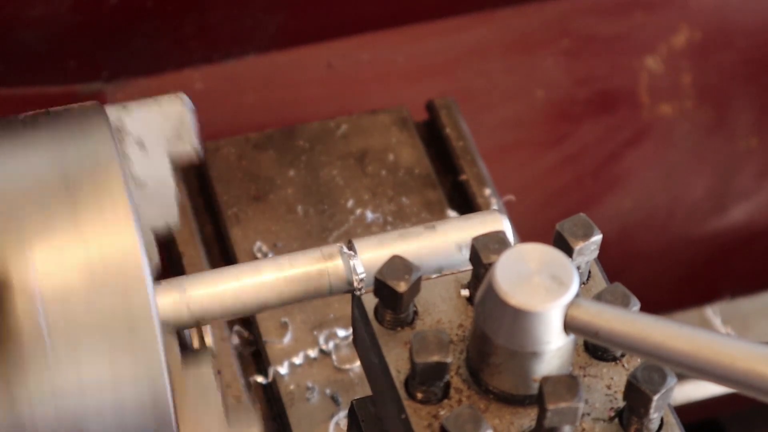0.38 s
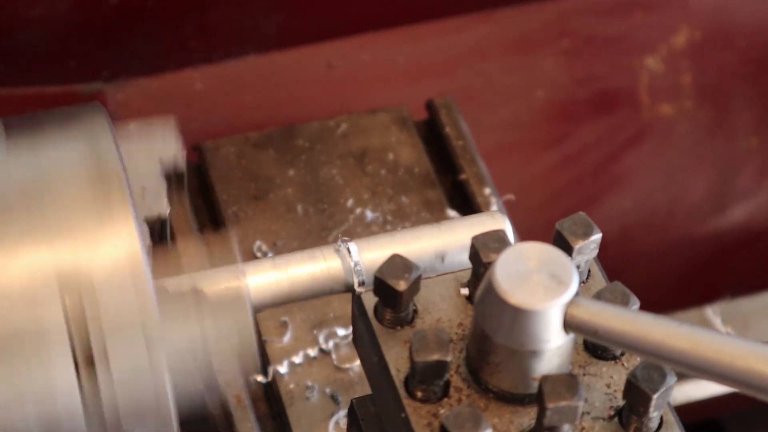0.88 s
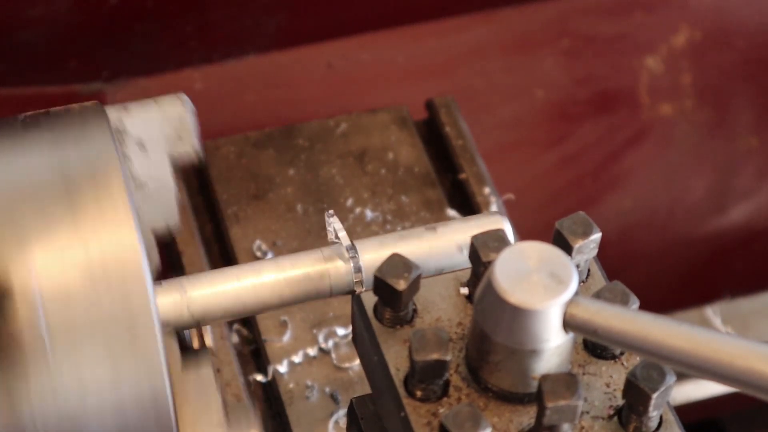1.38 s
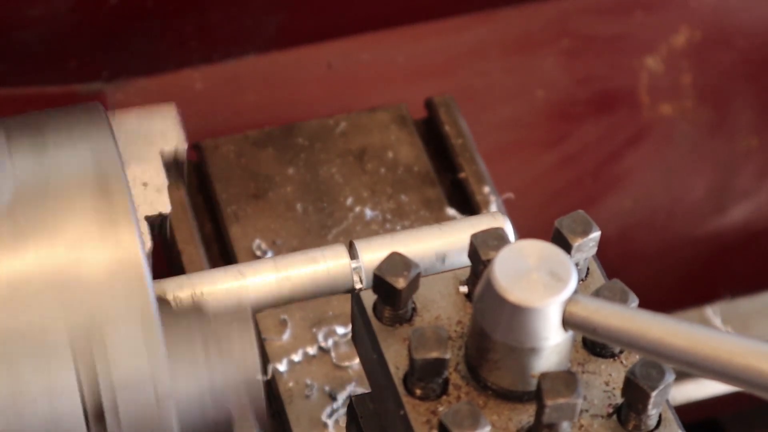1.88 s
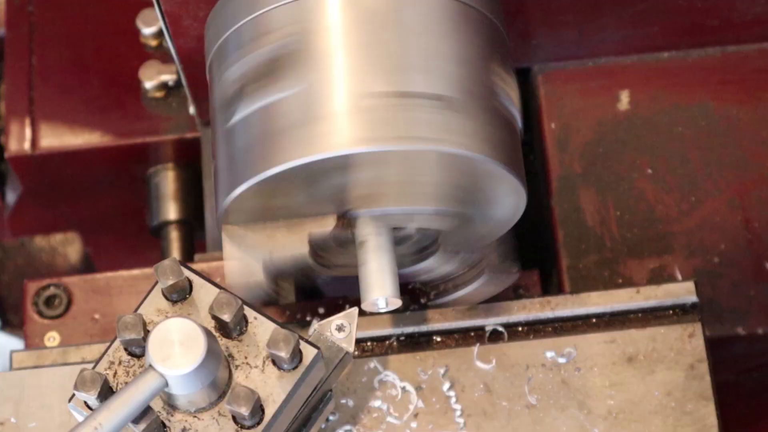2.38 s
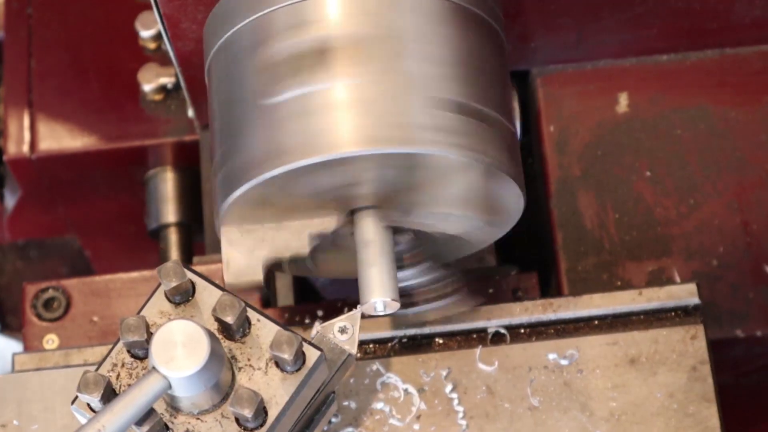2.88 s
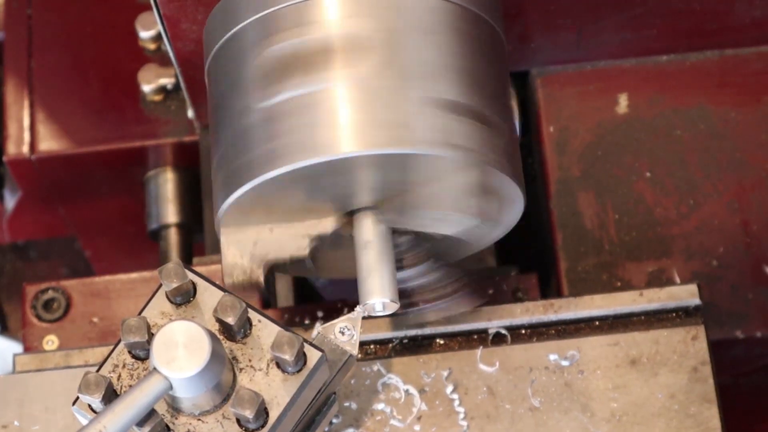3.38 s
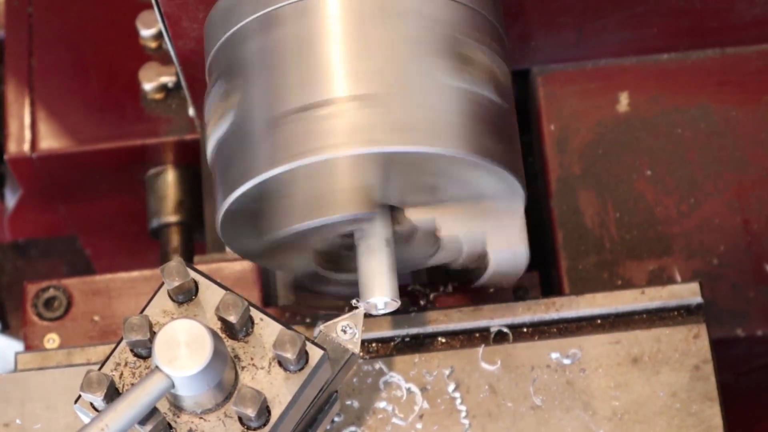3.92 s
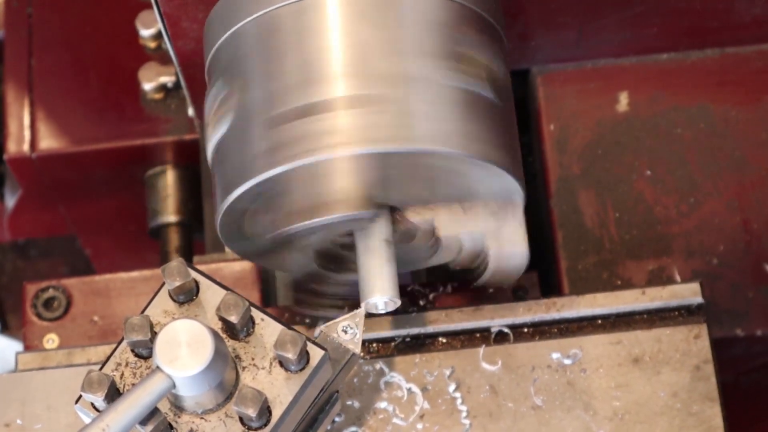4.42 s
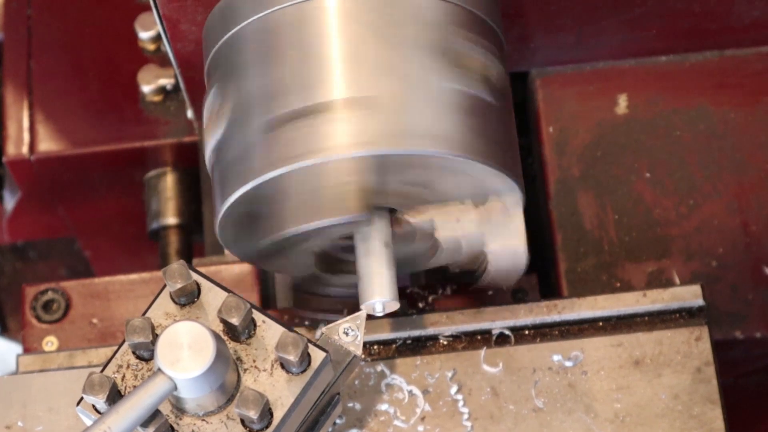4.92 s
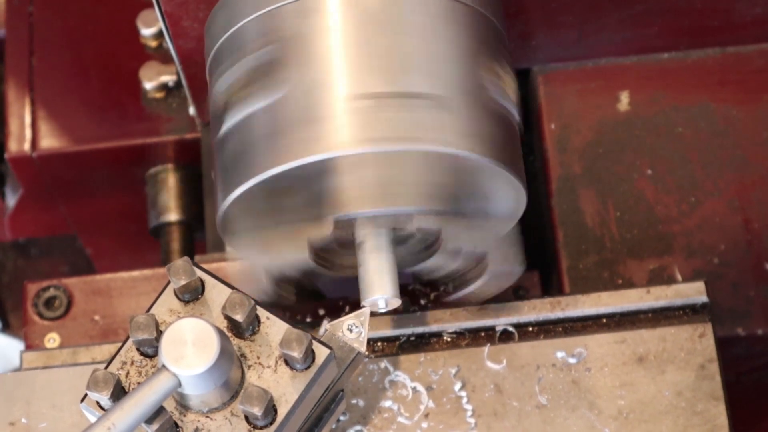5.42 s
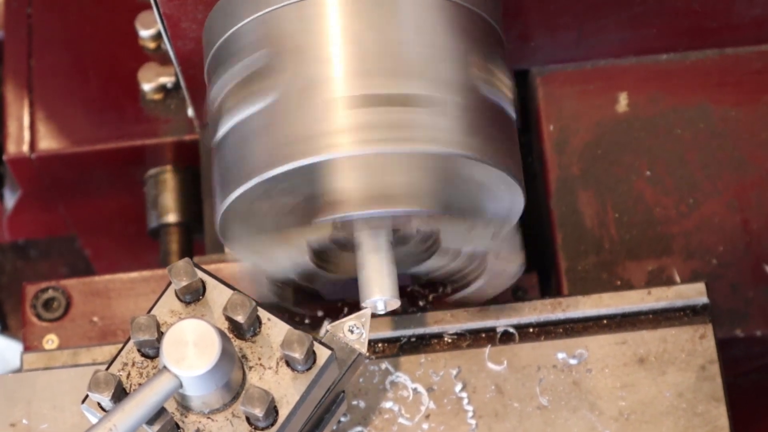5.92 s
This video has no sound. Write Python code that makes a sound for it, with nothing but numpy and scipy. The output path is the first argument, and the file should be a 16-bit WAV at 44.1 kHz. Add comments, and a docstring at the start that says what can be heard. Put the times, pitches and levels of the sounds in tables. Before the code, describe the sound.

Steady machine noise of a small lathe turning a metal rod: buzzing locked gear tones, shaft and bearing whines, metallic rattle and sizzling cutting hiss pulsing with each turn. Quieter and higher-pitched first, then an abrupt switch to a closer, louder, harsher whir at slower speed, held to the end. Close mono pickup, faint nearby reflections, weak bass.

```python
"""In a workshop, a benchtop lathe runs, heard first from the side at a higher speed, then closer from above.
Gear teeth make a comb of locked tones that throbs with a slower contact, and other parts whine.
The same blows shape a rattling hiss in the resonances of the casting; the tool hisses on the rod.
One early knock, faint low tones and short dips in level join in. A thin mono microphone drops the bass."""
import sys
import numpy as np
from scipy import signal
from scipy.fft import rfft, irfft
from scipy.io import wavfile

SR = 44100
rng = np.random.default_rng(int(sys.argv[2]) if len(sys.argv) > 2 else 0)


def output_pcm(signal):
    """Save a mono or channel-first signal as 16-bit PCM at the path in sys.argv[1].

    Samples are clipped to [-1, 1] before scaling.
    """
    pcm = np.clip(np.atleast_2d(signal).T, -1, 1) * 32767
    wavfile.write(sys.argv[1], SR, np.round(pcm).astype(np.int16))


def field_ratio(decibels):
    """Amplitude ratio for a level in dB (20 dB per decade); scalars and array-likes work."""
    return 10 ** (np.asarray(decibels, dtype=float) / 20)


N = 266364


def drift(rate):
    """Slow random wander of spread 1: noise sent twice through a one-pole low-pass at this rate in Hz."""
    # computed at every 40th sample, then joined by straight lines
    pole = np.exp(-80 * np.pi * rate / SR)
    noise = rng.standard_normal(N // 40 + 4002)
    slow = signal.lfilter([1], [1, -2 * pole, pole * pole], noise)[4000:]
    slow = (slow - slow.mean()) / slow.std()
    return np.interp(np.arange(N) / 40, np.arange(len(slow)), slow)


def tone(phase, db, waver_db):
    """A sine whose strength wavers around an rms level in dB."""
    return np.sqrt(2) * field_ratio(db + waver_db * drift(3.1)) * np.cos(phase)


def side_view(heard):
    """The lathe from the side: the faster speed, with a tool hiss that grows quickly."""
    # Locked tones. Each row: multiple of the tooth rate, multiple of the throb rate, rms level in dB before wavers.
    comb = [(1, 0, -66), (1, 1, -73), (1, 2, -72.5), (2, -1, -81), (2, 0, -67), (2, 1, -72), (3, -1, -69),
            (3, 1, -63), (4, -2, -70), (4, -1, -57.5), (4, 0, -44.5), (4, 1, -56.5), (4, 2, -59),
            (5, -1, -60.5), (5, 0, -61.5), (5, 1, -64), (5, 2, -72), (5, 3, -68), (6, 0, -61), (6, 1, -57),
            (7, -2, -57), (6, 3, -59.5), (7, 0, -63.5), (7, 1, -58), (7, 2, -59), (8, 0, -63), (8, 1, -68),
            (8, 2, -69), (8, 3, -66.5), (9, 2, -67), (9, 3, -67.5), (10, 2, -67.5), (10, 3, -73),
            (11, 0, -70)]
    # Whines of shafts and bearings. Each row: pitch in Hz, rms level in dB before wavers.
    lines = [(461.6, -94.5), (487.9, -94.5), (915.2, -92.4), (1148.0, -81.5), (1203.8, -81.5),
             (1384.9, -88), (1724.0, -75.5), (2010.0, -78.0), (2381.4, -60.5), (2408.4, -60),
             (2865.3, -76.2), (3156.0, -68.5), (3227.3, -70.0), (3310.7, -60.5), (3569.8, -63.5),
             (3635.1, -63.5), (3645.8, -62), (4362.5, -58.5), (4891.4, -70.4), (5106.1, -59), (5337.5, -78),
             (5524.6, -74), (11667.6, -69), (12851.3, -66), (14041.7, -64), (14291.3, -65),
             (15239.5, -69.3), (15482.4, -69)]
    # Casting resonances. Each row: centre in Hz, width in Hz before squaring, level in dB per Hz before gating.
    body = [(625, 200, -110.5), (1041, 97, -94.5), (1460, 87, -94), (1985, 69, -87), (2420, 132, -74.1),
            (3360, 220, -83.1), (3620, 152, -81), (3940, 199, -76), (4360, 270, -72), (5110, 87, -80.5),
            (6344, 580, -74.0), (7150, 350, -79.5), (7607, 330, -82.5), (8072, 112, -85.5),
            (8730, 422, -80), (9370, 524, -83.0), (9850, 525, -81.5), (10270, 421, -81.5),
            (10760, 265, -85), (11084, 320, -84.5), (11540, 120, -79), (11930, 179, -79),
            (12300, 240, -78.7), (12878, 99, -85), (13314, 123, -84.5), (14189, 682, -82.5),
            (14951, 416, -87), (15365, 753, -86)]
    # Rattle between the resonances. Each row: frequency in Hz, level in dB per Hz before gating.
    base = [(60, -144.3), (150, -137.4), (300, -117.3), (500, -116.3), (800, -110.7), (1200, -97),
            (1700, -97), (2800, -87), (4800, -84.5), (7000, -84), (9500, -90.5), (11500, -86), (14000, -87),
            (15700, -100.8)]
    hiss = tool_hiss_db(start_db=-4, growth_db=3, swell_db=2.4, turns=5.45, swell_s=1.024)
    return lathe(heard, (974.88, 242.27), comb, lines, body, base, hiss, hiss_hz=9800,
                 mesh_depth=.12, throb_depth=.17, waver_db=.3)


def top_view(heard):
    """The lathe closer and from above: the slower speed, with a steadier tool hiss."""
    # Locked tones. Each row: multiple of the tooth rate, multiple of the throb rate (both get rounded),
    # rms level in dB before wavers.
    comb = [(0, 1, -80), (1, 0, -67.5), (1, 1, -63), (1, 2, -66.5), (2, -2, -69), (2, 0, -50), (2, 1, -52),
            (3, -1, -54.5), (3, 0, -55), (3, 2, -60), (4, -1, -51.5), (4, 0, -44.5), (4, 0, -54),
            (4, 2, -45.5), (5, -1, -51), (5, 0, -40), (5, 1, -45.5), (5, 1, -57), (6, 0, -54), (6, 1, -53),
            (6, 1.5, -57), (6, 3, -62), (7, 0, -54.5), (7, 3.5, -54), (8, -1, -56.5), (8, 0.5, -58),
            (8, 2, -56), (9, 0.5, -56), (11, 2.5, -59)]
    # Whines of shafts and bearings. Each row: pitch in Hz, rms level in dB before wavers.
    lines = [(791.4, -68.5), (894, -75.0), (918.5, -82.0), (1293.3, -70.0), (1490, -67.5), (1626, -73),
             (1737, -60), (2060.5, -54), (2095, -55.5), (2474, -57), (2583, -57.5), (2729.3, -68),
             (3764, -48), (4616.9, -51), (10060, -53), (11124.6, -60.7), (12154.1, -67.0), (12364.8, -64),
             (13183.7, -54.4), (14425.9, -55), (14636.5, -66.0), (3423.0, -60), (5250, -61), (7461.4, -64),
             (7570, -54), (8057.8, -57), (8760, -55.0), (8802.0, -52), (9429.0, -52), (9589.3, -52),
             (9908.0, -53), (10302.4, -59.0), (10700.0, -62.0)]
    # Casting resonances. Each row: centre in Hz, width in Hz before squaring, level in dB per Hz before gating.
    body = [(320, 185, -99.2), (1008, 150, -86.5), (1310, 210, -83.5), (2080, 198, -65), (2570, 176, -71.5),
            (2860, 98, -73), (3170, 72, -73.0), (3743, 314, -65.5), (4160, 170, -60), (4460, 220, -65.5),
            (5230, 280, -68.2), (5640, 240, -69.0), (6140, 430, -72.5), (6640, 530, -72.0),
            (7390, 492, -68.5), (7960, 320, -69.5), (8280, 220, -68.5), (8750, 430, -65.5),
            (9250, 321, -70.5), (9740, 190, -69.5), (10320, 870, -67.5), (11423, 450, -77.5),
            (11900, 514, -76), (12300, 212, -76), (12800, 350, -71.1), (13249, 359, -74.6),
            (13739, 811, -75.4), (15209, 475, -80), (3410, 120, -71.5), (3750, 60, -64)]
    # Rattle between the resonances. Each row: frequency in Hz, level in dB per Hz before gating.
    base = [(60, -122.4), (150, -104.1), (300, -118.2), (500, -103.5), (800, -97), (1200, -104.0),
            (1700, -79.5), (2800, -77.5), (4800, -71), (7000, -83.5), (9500, -72.5), (11500, -85),
            (14000, -80.5), (15700, -81.5)]
    hiss = tool_hiss_db(start_db=-0.57, growth_db=0.18, swell_db=.9, turns=4.35, swell_s=4.125)
    return lathe(heard, (842.85, 209.62), comb, lines, body, base, hiss, hiss_hz=8600,
                 mesh_depth=.15, throb_depth=.09, waver_db=.5)


def lathe(heard, rates, comb, lines, body, base, hiss, hiss_hz, mesh_depth, throb_depth, waver_db):
    """One viewpoint: all parts run on one clock whose speed drifts slightly; rates are tooth and throb in Hz."""
    clock = np.cumsum(1 + 0.000149 * drift(0.59)) / SR   # seconds
    mesh, throb = (2 * np.pi * hz * clock for hz in rates)
    tones = gears(mesh, throb, comb, waver_db)
    tones = tones + whines(clock, lines, wander=0.79, waver_db=waver_db + 1.2)
    noise = rattle(mesh, throb, body, base, hiss, hiss_hz, mesh_depth, throb_depth, flicker_db=0.33)
    return heard * (tones + noise)


def gears(mesh, throb, comb, waver_db):
    """Tones around one tooth multiple start at nearly the same phase, so together they pulse at the throb rate."""
    start = rng.uniform(0, 2 * np.pi, 20)
    out = np.zeros(N)
    for i, j, db in comb:
        phase = round(i) * mesh + round(j) * throb
        out += tone(phase + start[round(i)] + rng.normal(0, 0.49), db, waver_db)
    return out


def whines(clock, lines, wander, waver_db):
    """Unlocked tones of shafts and bearings, each wandering a little in phase (radians)."""
    return sum(tone(2 * np.pi * hz * clock + wander * drift(2.6), db, waver_db) for hz, db in lines)


def rattle(mesh, throb, body, base, hiss, hiss_hz, mesh_depth, throb_depth, flicker_db):
    """Noise gated by tooth contacts, throbs and shaft turns, coloured by the casting and the tool hiss."""
    shaft = throb / 4   # four throbs to a turn
    throb_shape = np.cos(throb) + 0.66 * np.cos(2 * throb)
    gate = np.exp(mesh_depth * np.cos(mesh) + throb_depth * throb_shape + 0.056 * np.cos(shaft))
    force = gate / gate.mean() * field_ratio(flicker_db * drift(15)) * rng.standard_normal(N)

    hz = np.maximum(np.arange(N // 2 + 1) * SR / N, 1)
    base_hz, base_db = np.transpose(base)
    power = field_ratio(np.interp(np.log(hz), np.log(base_hz), base_db)) ** 2
    for centre_hz, width_hz, db in body:
        # squared: each resonance acts twice, so its skirts are steep
        power = power + field_ratio(db) ** 2 / (1 + (2 * (hz - centre_hz) / width_hz) ** 2) ** 2
    spectrum = rfft(force) * np.sqrt(power * SR / 2) * (hz < 15740)
    spectrum = spectrum * near_echoes(hz, echo_db=-23.0)

    # the hiss takes a wide band of the noise, with a narrower core that swells
    octave_like = np.log(hz / hiss_hz)
    share = np.exp(-(octave_like / .24) ** 2)
    core = np.exp(-(octave_like / 0.081) ** 4)
    hiss_db, turn_db = hiss
    hiss_sound = irfft(spectrum * share * (1 - core), N) + field_ratio(turn_db) * irfft(spectrum * share * core, N)
    rest = irfft(spectrum * (1 - share), N)
    return rest + field_ratio(hiss_db + .5 * drift(8)) * hiss_sound


def tool_hiss_db(start_db, growth_db, swell_db, turns, swell_s):
    """The hiss grows each second; its core also swells once a turn of the slightly eccentric rod."""
    t = np.arange(N) / SR
    return start_db + growth_db * t, swell_db * np.cos(2 * np.pi * turns * (t - swell_s))


def near_echoes(hz, echo_db, count=10):
    """Reflections off tray, bed and wall within a few metres ripple the spectrum."""
    delays = rng.uniform(.003, .014, count)   # seconds
    signs = rng.choice([-1, 1], count)
    echoes = sum(sign * np.exp(-2j * np.pi * hz * lag) for lag, sign in zip(delays, signs))
    return (1 + field_ratio(echo_db) * echoes) / np.sqrt(1 + count * field_ratio(echo_db) ** 2)


def ring(x):
    """One resonance of the machine, near 2.6 kHz, is strong at first and then steps down."""
    centre_hz, width_hz = 2610, 150
    before_db, after_db, step_s, step_length_s = 2.5, -2.6, 3.82, .05
    hz = np.arange(N // 2 + 1) * SR / N
    band = irfft(rfft(x) * np.exp(-((hz - centre_hz) / width_hz) ** 2), N)
    after = .5 + .5 * np.tanh((np.arange(N) / SR - step_s) / step_length_s)
    return x + (field_ratio(before_db + (after_db - before_db) * after) - 1) * band


def knock():
    """One knock: decaying modes with a soft rise."""
    # Each row: pitch in Hz, level in dB relative to the knock, time to fall by 60 dB in seconds.
    modes = [(1310, -3, .06), (1420, -3, .08), (1510, 1, .06)]
    start_s, knock_db = .081, -48
    t = np.maximum(np.arange(N) / SR - start_s, 0)
    rise = 1 - np.exp(-t / 0.0035)
    return sum(field_ratio(knock_db + db - 60 * t / t60) * rise * np.sin(2 * np.pi * hz * t) for hz, db, t60 in modes)


def swells():
    """Faint low tones: each grows towards its end while its pitch eases to the final value, then stops."""
    # Each row: start in seconds, length in seconds, first pitch in Hz, last pitch in Hz,
    # final rms level in dB before the fade at the end.
    glides = [(.0, .09, 590, 585, -80), (0.661, 0.15, 640, 581, -81), (0.688, .11, 1200, 1120, -70),
              (1.03, 0.15, 640, 575, -80), (2.6, .81, 405, 428, -69.5), (2.95, .39, 148, 150.7, -78),
              (3.46, .16, 400, 395, -74), (4.37, 0.48, 149, 148, -72)]
    rise_db, edge_s = 7.5, .025
    out = np.zeros(N)
    for start_s, length_s, from_hz, to_hz, db in glides:
        t = np.arange(N) / SR - start_s
        left = np.clip(1 - t / length_s, 0, 1)
        edges = np.clip(np.minimum(t, length_s - t) / edge_s + .5, 0, 1)
        hz = to_hz + (from_hz - to_hz) * left ** 2
        out += edges * tone(2 * np.pi * np.cumsum(hz) / SR, db - rise_db * left, waver_db=0.1)
    return out


def hums():
    """Two faint low tones of fixed pitch that waver in strength and phase."""
    # Each row: pitch in Hz, rms level in dB before wavers, phase wander in radians.
    low_tones = [(402, -80, 1.4), (149, -86, 0.54)]
    t = np.arange(N) / SR
    return sum(tone(2 * np.pi * hz * t + wander * drift(4.4), db, waver_db=3.0) for hz, db, wander in low_tones)


def dips():
    """A gain with short bell-shaped drops on top of a slight waver."""
    # Each row: middle of the drop in seconds, depth in dB.
    drops = [(.717, -1.5), (1.67, -2.5), (1.821, -2.5), (2.958, -3.5), (3.04, -2.5), (3.069, -2.5),
             (3.093, -1), (3.246, -2), (3.331, -3.5)]
    waver_db, width_s = .3, .006
    t = np.arange(N) / SR
    drop_db = sum(db * np.exp(-.5 * ((t - middle_s) / width_s) ** 2) for middle_s, db in drops)
    return field_ratio(waver_db * drift(4.0) + drop_db)


def scene():
    """Side view, then top view, on both channels alike."""
    top = np.arange(N) >= 2.4341 * SR   # the viewpoint changes at this second
    side_part = side_view(~top)
    top_part = top * (ring(top_view(top)) + hums())
    mono = (side_part + top_part + swells() + knock()) * dips()
    return np.tile(mono, (2, 1))


def low_pass(x):
    """Removes everything above the highest recorded frequency."""
    return signal.sosfilt(signal.butter(12, 17000, fs=SR, output="sos"), x)


def record(dry):
    """A thin microphone drops the bass below about 82 Hz."""
    bass_cut = signal.butter(2, 82, "high", fs=SR, output="sos")
    thin = signal.sosfilt(bass_cut, dry)
    return low_pass(thin)


dry = scene()
out = record(dry)
output_pcm(out)
```